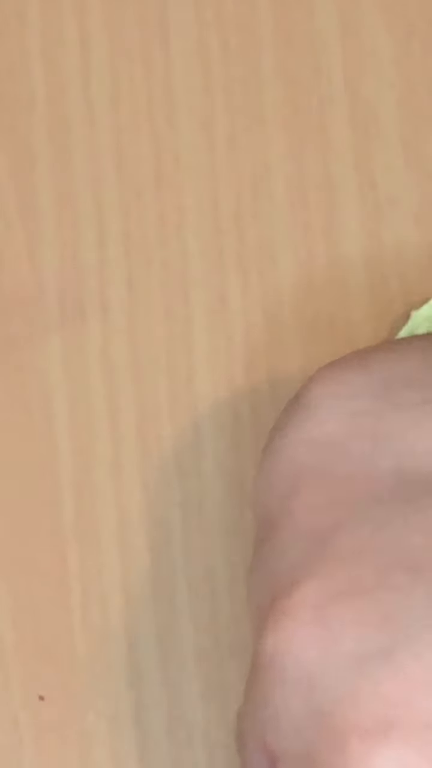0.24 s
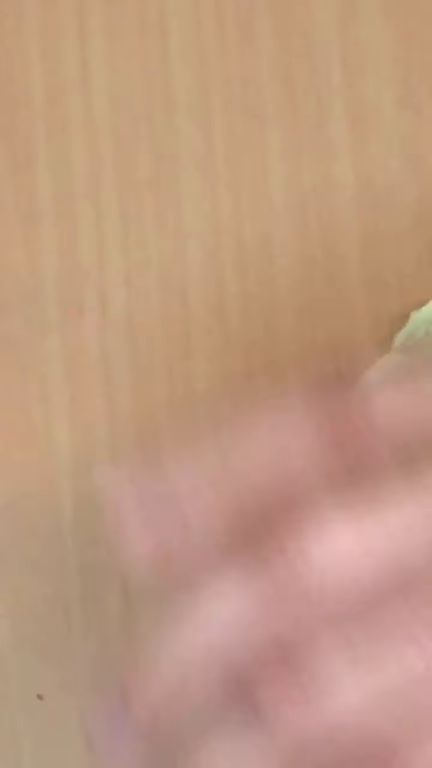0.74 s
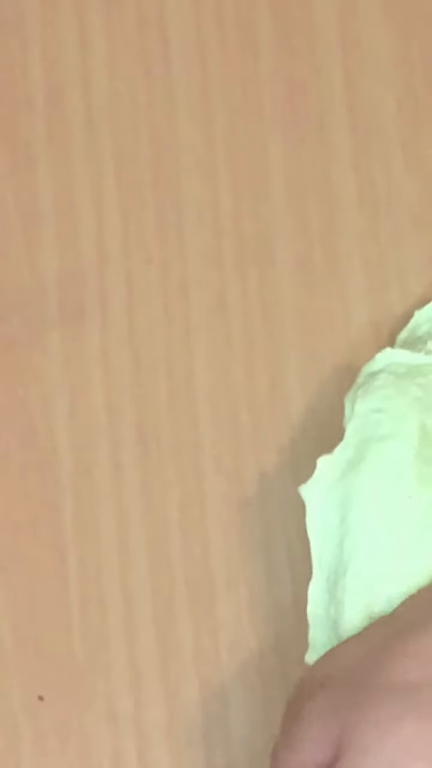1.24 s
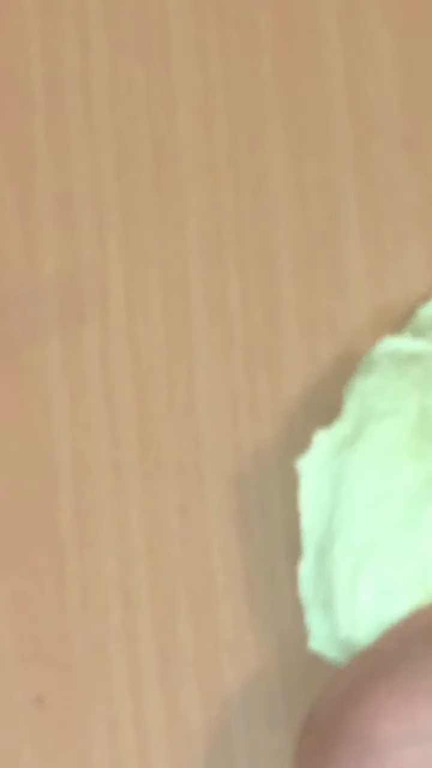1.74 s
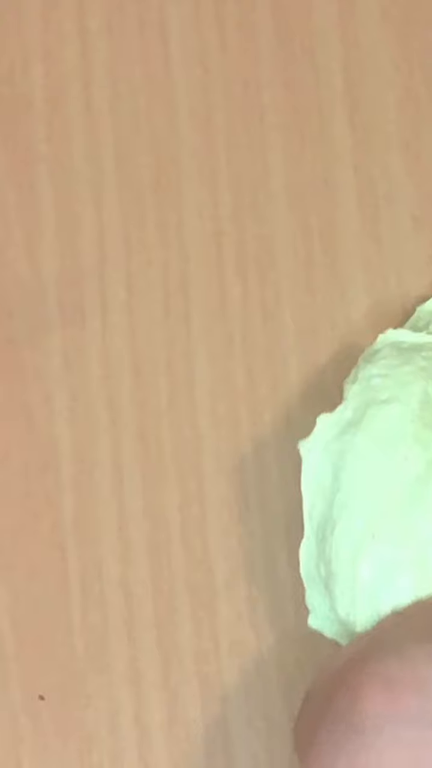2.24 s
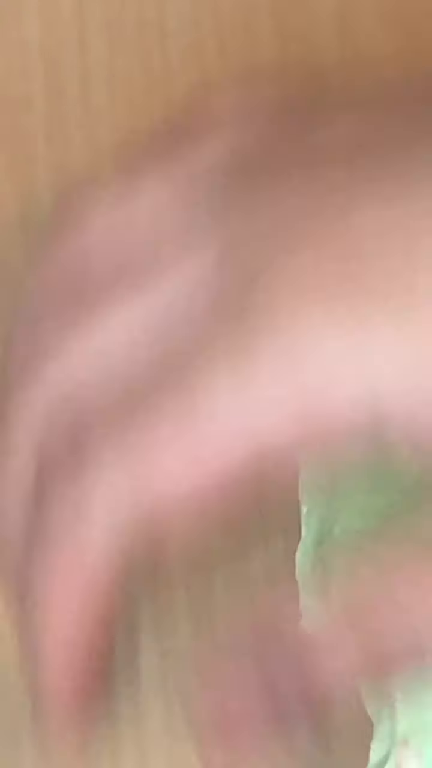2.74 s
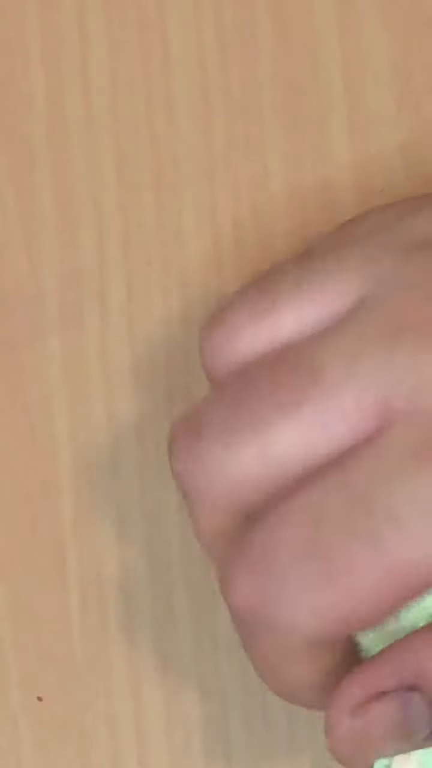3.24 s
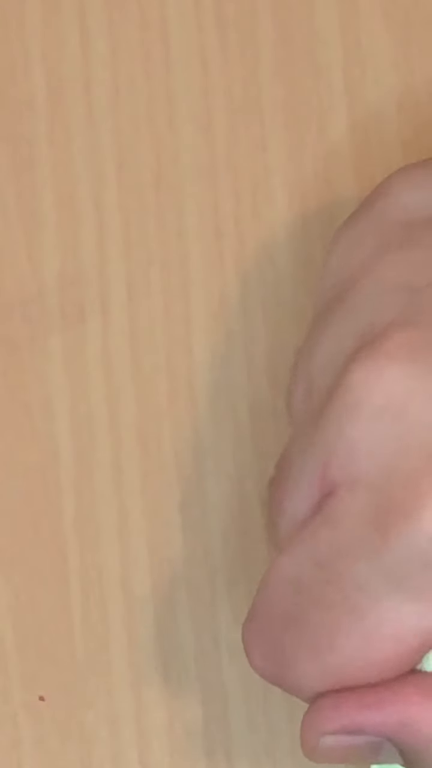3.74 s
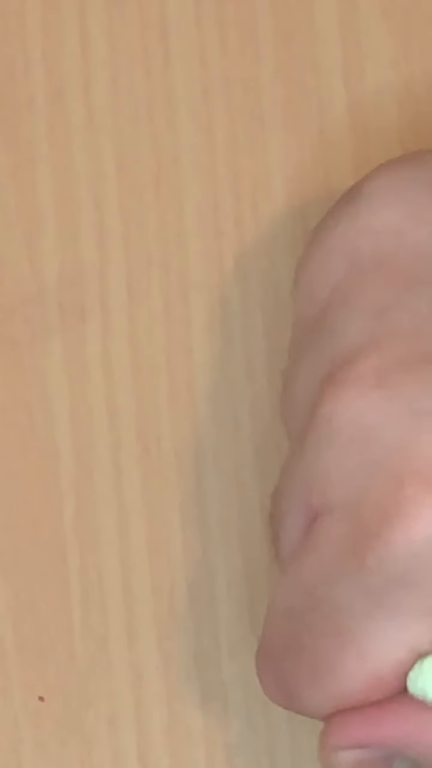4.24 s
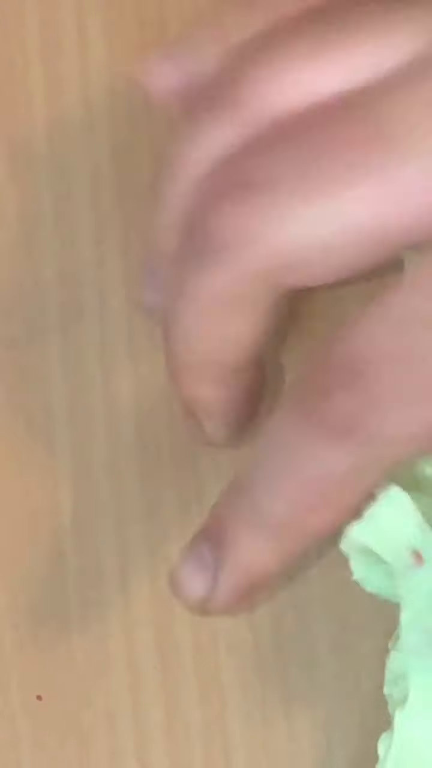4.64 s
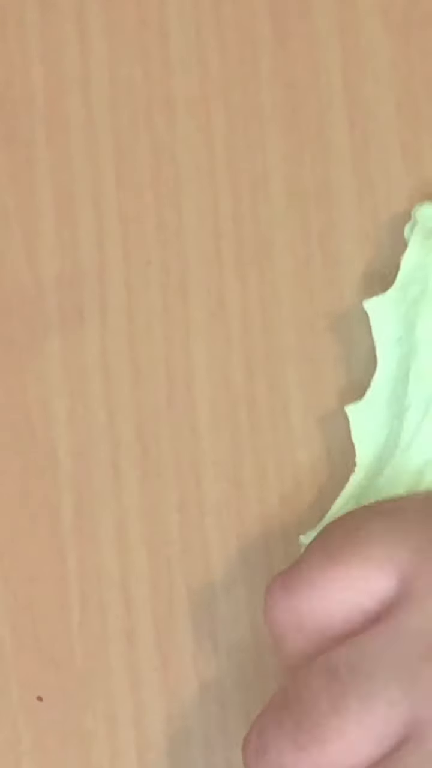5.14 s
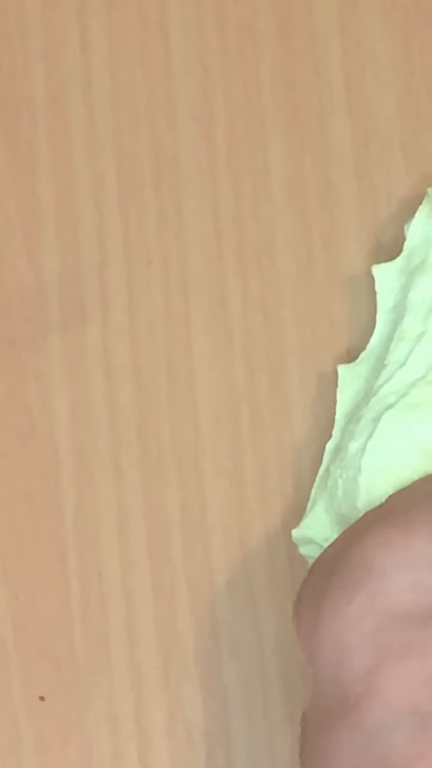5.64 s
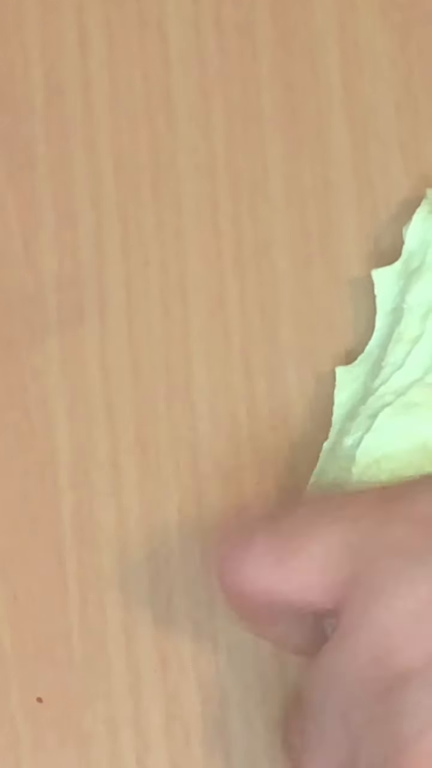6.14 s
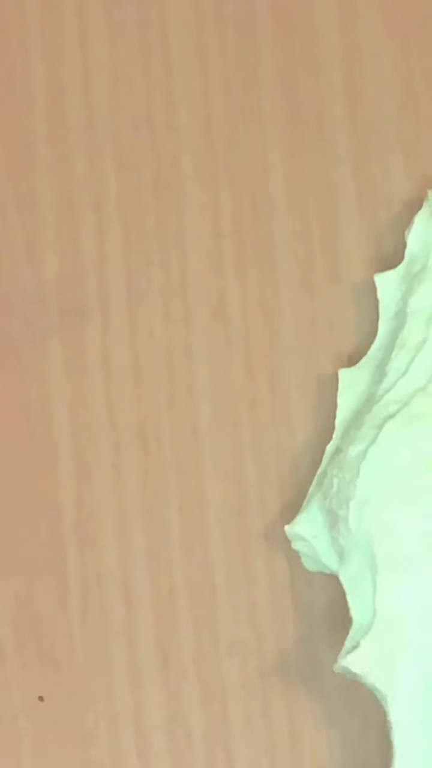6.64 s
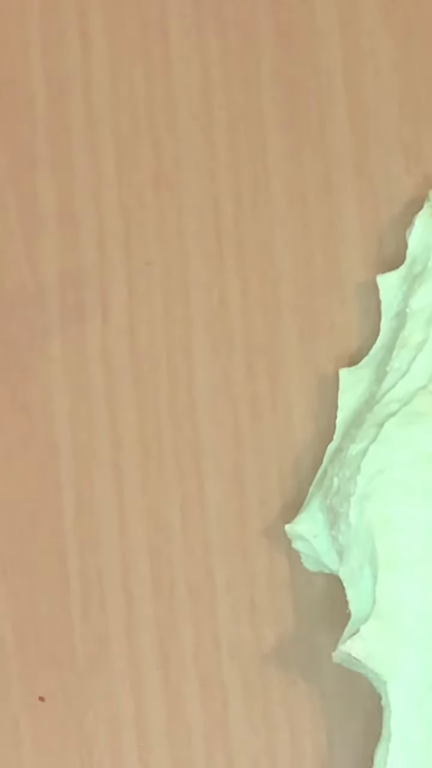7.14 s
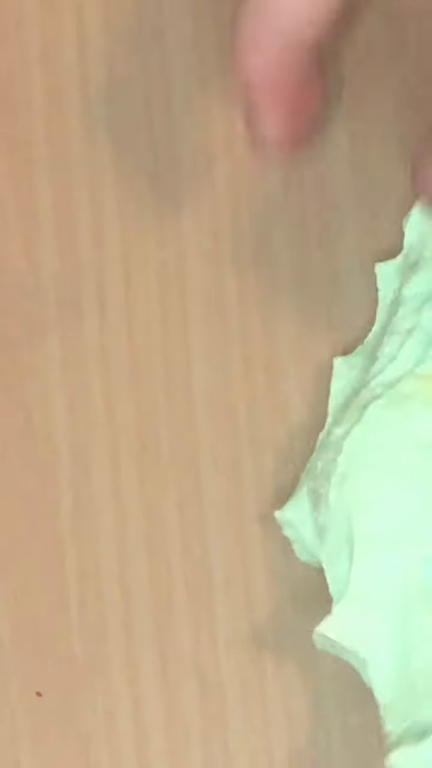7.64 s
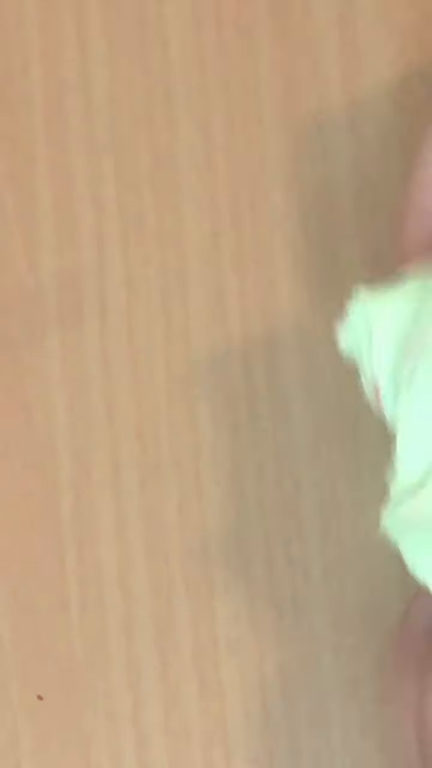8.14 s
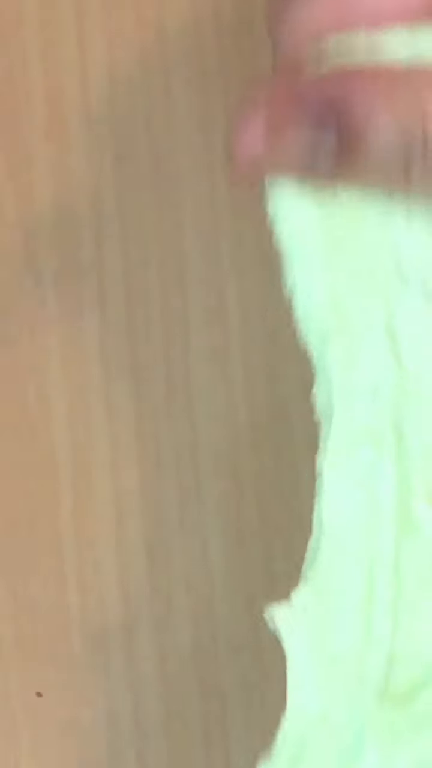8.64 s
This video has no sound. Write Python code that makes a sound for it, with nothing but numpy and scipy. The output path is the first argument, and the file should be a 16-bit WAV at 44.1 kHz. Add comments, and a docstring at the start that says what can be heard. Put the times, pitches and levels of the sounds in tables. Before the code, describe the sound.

Close-up kneading of soft slime: bursts of sharp air-pocket pops over fine crackle, sticky skin rubs and low wet plops in a small room.

```python
"""A small room, a wooden table, the microphone close to a hand kneading soft slime.
At once a squeeze bursts large air pockets: sharp pops over fine crackle; then skin rubs off and bumps the table.
Squeezes return from about 1, 3, 5 and 6.8 s, some with low wet plops; a tiny squeak slips out near 6.9 s.
Films snap and cavities ring, skin lets go in filtered noise slips, plops and bumps knock in decaying sines.
Table reflections, room echoes and a faint rumble and hiss lie under it all; the loudest pops overload."""
import sys
import numpy as np
from scipy import signal
from scipy.fft import rfft, irfft
from scipy.io import wavfile
from scipy.ndimage import uniform_filter1d

SR = 44100
rng = np.random.default_rng(int(sys.argv[2]) if len(sys.argv) > 2 else 0)


def wav_record(signal):
    """Record a signal, one row per channel, as 16-bit PCM in the file named by sys.argv[1]."""
    frames = np.transpose(np.atleast_2d(signal))
    bounded = np.clip(frames, -1, 1)
    # unit amplitude maps onto the largest positive 16-bit level
    quanta = np.round(bounded * 32767).astype(np.int16)
    wavfile.write(sys.argv[1], SR, quanta)


N = 392490
TOP_HZ = 15900  # upper limit of the microphone and of the random burst pitches


def undb(db):
    """Decibels to gain."""
    return 10 ** (np.asarray(db) / 20)


def unit(x):
    """Scale to an energy of one."""
    return x / np.sqrt(np.sum(x ** 2) + 1e-18)


def seconds(length):
    """A time axis in seconds."""
    return np.arange(int(length * SR)) / SR


def add(track, s, x):
    """Mix a short sound into a track at a time in seconds."""
    i = int(np.clip(s * SR, 0, N - 1))
    track[i:i + len(x)] += x[:N - i]


def lookup(points, hz):
    """Read (f/Hz, value) points on a log-frequency axis."""
    f, value = np.transpose(points)
    return np.interp(np.log(hz + 1), np.log(f), value)


def shape(x, points):
    """Filter a sound by (f/Hz, level/dB) points."""
    gain = undb(lookup(points, np.fft.rfftfreq(len(x), 1 / SR)))
    return irfft(rfft(x) * gain, len(x))


def colour(x, points):
    """Filter a sound by a spectrum and scale it to an rms of one."""
    y = shape(x, points)
    return y / np.std(y)


def ring(x, hz, q):
    """A two-pole resonance, with the same shape high in the treble as lower down."""
    f = np.fft.rfftfreq(len(x), 1 / SR) + 1e-3  # avoids dividing by zero
    return irfft(rfft(x) / (1 + 1j * q * (f / hz - hz / f)), len(x))


def wander(rate):
    """Smooth random drift with a spread of one, from `rate` random steps per second."""
    k = max(int(SR / rate), 1)
    steps = np.repeat(rng.standard_normal(N // k + 1), k)[:N]
    y = uniform_filter1d(steps, k)
    return y / np.std(y)


def pop(hz, q, snap_db, snap_hz=6500, snap_q=0.27, tear_s=.0001, edge=1.0,
        skin_hz=480, skin_s=.0016, sag_s=0.0016, sag_by=.6, skin_db=-22.0):
    """A film tears with a snap, its air pocket rings briefly, and the slime skin shakes, most for low pockets."""
    t, q = np.arange(512) / SR, max(q, .3)
    kick = signal.unit_impulse(len(t), 8)
    # a pocket takes time to open, so its ring has a steep upper edge
    edge_hz = min(hz * (1 + edge / q), .45 * SR)
    opening = signal.lfilter(*signal.butter(4, edge_hz, fs=SR), kick)
    cavity = unit(ring(ring(opening, hz, q), hz, q))
    tear = rng.standard_normal(len(t)) * np.exp(-t / tear_s)
    tear = np.roll(tear, shift=np.argmax(kick))
    snap = unit(ring(.5 * unit(tear) + kick, snap_hz, snap_q))
    # the slackening skin drops in pitch: a wet plop
    sag = skin_hz * 2 ** (0.23 * rng.standard_normal()) * (1 + sag_by * np.exp(-t / sag_s))
    plop = np.sin(2 * np.pi * np.cumsum(sag) / SR) * np.exp(-t / skin_s)
    skin = unit(plop * np.sin(np.pi * t / t[-1])) * (2500 / hz) ** .45
    return unit(cavity + undb(snap_db) * snap + undb(skin_db) * skin)


# the large air pockets, each heard as its own pop:
# (t/s, energy level/dB, cavity f/Hz, cavity Q [at least 0.3 is used], film snap level/dB re cavity)
POCKETS = [(0.0022, 11.5, 2080, 2.1, 2.5), (0.0271, 14, 1960, 1.2, 7.5), (0.08, 9, 12000, 0.79, -3.5),
           (0.091, 3.5, 14500, .65, -9.5), (0.104, 11.5, 6800, 0.84, 7.5), (0.1954, 10, 9600, 0.89, 0.5),
           (0.2126, 8.5, 9840, 1.1, 3.5), (0.2317, 3, 12000, 2.7, 4), (0.258, 4, 11300, 1.9, 11),
           (1.1088, -22.5, 4830, 3.7, 0), (1.117, -28, 10100, 1, -1), (1.1459, -14, 900, 0.37, -15),
           (1.213, -3.5, 1720, 0.46, -23.5), (1.2546, 5.5, 2130, 0.37, -21), (1.2758, -7.5, 3280, .3, -30),
           (1.3224, -4.5, 1430, 0.69, -1), (1.3392, -14.5, 1530, 3.7, -16), (1.3837, -12, 3140, .7, -4.5),
           (1.4177, 5.5, 2920, 0.58, -7.5), (1.4217, -3.5, 7120, 2.5, 4.5), (1.433, 0.5, 10500, 2.2, -10),
           (1.4393, 2, 2800, .5, -14), (1.4626, -1, 1250, 0.35, 9), (1.5293, 4.5, 11300, 1.5, -3.5),
           (1.5671, 4.5, 7700, 0.52, -5.5), (1.6008, 8.5, 3540, 0.59, -25.5),
           (1.6417, -4.5, 14500, .45, -6.5), (1.656, -9.5, 14500, .65, -16), (1.6999, 14, 2200, 0.37, -5.5),
           (1.7812, 13.5, 7300, 0.95, -16), (1.9737, -9, 14500, 1.7, 0), (1.9814, -12, 3400, 0.72, -20),
           (2.0555, 7, 2790, 1.55, 0), (3.2467, -26, 2880, 0.41, -22), (3.3647, -7, 4800, 0.47, 4),
           (3.5045, -13, 4530, 0.49, 18), (3.598, -16.5, 3350, 0.62, -27.5), (3.663, -13, 4250, 0.59, -19),
           (3.6698, -7.5, 6200, 4.9, 4), (3.7052, 8, 4280, 0.71, -29.5), (3.723, -9.5, 1430, 1.4, 3.5),
           (3.753, 1.5, 4260, 0.94, -22), (3.7991, -7, 3980, 0.9, -24), (3.8083, -7, 11400, 1.9, 7),
           (3.84, -9.5, 12800, 2, -11), (3.873, -5.5, 12600, 3.5, 2), (3.9794, -22, 3980, 1.6, -4),
           (4.0778, -10, 1300, 0.34, -2.5), (4.1358, -5, 3600, 2.6, -16), (4.259, -16.5, 4530, .45, -20),
           (5.055, -8.5, 2350, 0.73, -18), (5.1843, 0, 2160, 1.24, -11), (5.204, 6, 4200, 0.5, 4),
           (5.274, 1.5, 3360, 0.62, -7), (5.321, 6, 9000, 0.93, -20), (5.359, -14, 1770, 4, -28),
           (5.3959, -4.5, 13000, 1.6, 8), (5.43, -12, 2530, 0.92, 2), (5.474, -10, 2000, 1.1, -2),
           (5.5106, -4, 2380, 1.2, -4), (5.5443, -11, 9840, 0.95, 0), (5.5645, -3.5, 13590, 1.8, 5),
           (5.6355, 3.5, 11800, 0.99, -3), (5.674, -4.5, 11300, 2.4, 6.5), (5.679, 3.5, 12800, 2, -13.5),
           (5.7821, -3, 10400, 3, -1), (5.8013, -1, 10500, 4.7, -3), (5.817, -5, 9840, 2.3, 22),
           (6.8064, -11, 2390, 2.2, -1.5), (6.8315, -5.5, 8650, 0.48, 14), (6.8509, -6.5, 5640, 0.55, -14),
           (6.9382, -6, 4600, 2.4, 4), (7.0176, -6.5, 2970, 1.1, -6), (7.0375, -16, 12000, 1.1, -2),
           (7.0493, -12, 14700, 1.3, -2), (7.1005, 7.5, 5600, 0.65, -12.5), (7.6533, -21, 9180, 0.68, 2),
           (8.0307, -12, 7200, 0.37, 4), (8.1115, -13, 2260, .4, -27), (8.3901, -21, 2370, 0.31, -15),
           (8.4815, -18.5, 2660, 0.23, -23), (8.581, 4.5, 8550, 0.91, -16.5), (8.7677, -9, 11700, 3.8, 11),
           (8.8626, -4.5, 11940, 2.9, 19)]


def pops(count=3, weaker_db=-24.5, lag_s=.0025, lag_spread_s=.0022, spread_db=4.5, spread_octaves=0.55):
    """Large pockets burst one by one, each taking a few weak neighbours with it, mostly just after."""
    out = np.zeros(N)
    chance = rng.standard_normal((len(POCKETS), count, 3))
    for (s, db, hz, q, snap_db), neighbours in zip(POCKETS, chance):
        # the kick inside a pop comes about 0.2 ms after its start
        add(out, s - .0002, undb(db) * pop(hz, q, snap_db))
        for lag, size, pitch in neighbours:
            burst = pop(min(hz * 2 ** (spread_octaves * pitch), TOP_HZ), q, snap_db)
            level = undb(db + weaker_db + spread_db * size)
            add(out, s + lag_s + lag_spread_s * lag, level * burst)
    return out


# squeezes that burst the smaller bubbles:
# (start t/s, end t/s, bubble energy level/dB before the crackle trim, middle f/Hz)
SQUEEZES = [(0, 0.292, -13.5, 8400), (0.989, 1.201, -46.5, 5000), (1.191, 1.94, -27, 5440),
            (3.091, 3.478, -43, 4970), (3.475, 3.904, -24, 6500), (3.948, 4.3, -37, 5950),
            (5.082, 5.922, -26.5, 5840), (6.758, 7.08, -24, 7450), (7.397, 7.734, -36, 6500),
            (7.9, 8.302, -36.5, 5900), (8.386, 8.619, -24, 7100), (8.614, 8.9, -30.5, 7800)]


def crackle(rate=180, spread_db=5.5, spread_octaves=.9, q=1.4, snap_db=-10, trim_db=-4,
            grip_s=0.068, ease_s=0.04, slack_db=-6):
    """Small bubbles burst at random under pressure, weaker as the grip tightens and as it eases."""
    out = np.zeros(N)
    chance = rng.standard_normal((int(rate * N / SR), 3))
    for k, (slip, size, pitch) in enumerate(chance):
        s = (k + slip) / rate
        for start, end, db, hz in SQUEEZES:
            if start < s < end:
                grip = min(1, (s - start) / grip_s, (end - s) / ease_s)
                energy_db = trim_db + db + slack_db * (1 - grip) + spread_db * min(size, 2)
                burst = pop(min(hz * 2 ** (spread_octaves * pitch), TOP_HZ), q, snap_db)
                add(out, s, undb(energy_db) * burst)
    return out


def squeak(start=6.9045, from_hz=3100, to_hz=3800, db=-23, air_db=1):
    """Air forced through a pinhole flutters its rim; the pitch rises as the pocket empties."""
    out, t = np.zeros(N), seconds(.0135)
    u = t / t[-1]
    flutter_hz = 900 * rng.standard_normal(len(t))
    phase = 2 * np.pi * np.cumsum(from_hz + (to_hz - from_hz) * u + flutter_hz) / SR
    tone = sum(undb(-4 * k) * np.sin((k + 1) * phase) for k in range(4))
    air = ring(rng.standard_normal(len(t)), 8300, 1.7)
    hiss = undb(air_db) * 2 * (1 - u) * air / np.std(air)
    swell = np.sin(np.pi * np.sqrt(u))
    add(out, start, undb(db) * swell * (tone + hiss))
    return out


def slide(length, attack_s=0.038, sag_db_per_s=39, release_s=0.033):
    """Pressure of one slide: it swells, weakens as the skin peels away, then lets go."""
    t = seconds(length + release_s)
    contact = np.minimum(np.minimum(t / attack_s, (t[-1] - t) / release_s), 1)
    return np.sin(np.pi / 2 * contact) ** 2 * undb(-sag_db_per_s * t)


# skin sliding off the slime: (start t/s, length t/s before the release, level/dB before sag and trim)
RUBS = [(0.333, 0.12, -52.5), (0.418, 0.19, -40), (2.2, 0.12, -58), (2.298, 0.11, -48), (2.415, 0.078, -39),
        (2.491, 0.13, -45.5), (4.312, 0.073, -45.5), (4.397, .2, -43), (6.01, 0.074, -54),
        (6.068, 0.099, -47), (6.147, 0.16, -43), (6.628, 0.14, -50.5), (7.218, 0.15, -52.5),
        (7.289, 0.11, -44.5), (7.391, 0.18, -56), (7.543, 0.15, -53.5), (7.697, 0.12, -62),
        (7.854, 0.19, -50.5), (8.038, 0.08, -43), (8.125, 0.13, -56), (8.268, 0.14, -58.5)]
# spectrum of the sticky skin contact: (f/Hz, level/dB)
RUB_COLOUR = [(59, -45), (100, -12), (202, -1), (271, -12.5), (358, -3.5), (662, -11), (1760, -4.5),
              (2130, -13.5), (2690, -7.5), (3540, -11.5), (4290, -11.5), (16000, -16.5)]


def rubbing(trim_db=-2, grain_db=5, flutter_db=2.5, patchy_db=4.5):
    """Skin lets go of the sticky surface in countless tiny slips; their colour shifts as the contact moves."""
    pressure = np.zeros(N)
    for s, length, level_db in RUBS:
        add(pressure, s, undb(level_db) * slide(length))
    grain = undb(grain_db * np.minimum(rng.exponential(size=N), 5))
    slips = rng.standard_normal(N) * grain
    # peel off one band after another, each with its own drifting level
    lumpy = 0
    for hz in 250 * 2 ** np.arange(0, 5, .7):
        low = signal.sosfiltfilt(signal.butter(2, hz, fs=SR, output="sos"), slips)
        lumpy, slips = lumpy + low * undb(patchy_db * wander(45)), slips - low
    flutter = undb(trim_db + flutter_db * wander(130))
    return colour(lumpy + slips, RUB_COLOUR) * pressure * flutter


# low plops of wet slime bubbles, and soft bumps of hand and slime on the table:
# (t/s, level/dB, knock f/Hz)
PLOPS_AND_BUMPS = [(0.444, -40, 320), (1.214, -33.5, 421), (1.257, -34.5, 362), (1.323, -38.5, 327),
                   (2.445, -40.5, 357), (3.246, -46.5, 543), (3.505, -48, 434), (3.724, -43, 375.5),
                   (5.187, -40.5, 329), (5.31, -34, 458), (5.398, -36, 616), (6.502, -28.5, 393),
                   (7.446, -43, 299), (7.876, -38.5, 404), (8.088, -34, 517), (8.236, -45, 261)]
# modes of the short hollow knock: (multiple of the knock f, level/dB, t60/s)
KNOCK_MODES = [(1 / 3, -17, .1), (1 / 2, -14, .09), (3 / 4, -6, .07), (7 / 8, 0, .09), (1, -1, .08),
               (2, -24, .06)]


def plops_and_bumps(pat_db=-14, pat_s=0.026, pat_hz=1700, pat_q=0.75, push_s=0.00086, thud_db=-14):
    """A low plop or a soft bump: a short hollow knock, a dull thud and a brief pat of noise."""
    out, t = np.zeros(N), seconds(.25)
    for s, db, hz in PLOPS_AND_BUMPS:
        pitches = hz * (1 + .015 * rng.standard_normal(len(KNOCK_MODES)))
        knock = 0
        for (ratio, gain, t60), f in zip(KNOCK_MODES, pitches):
            knock = knock + undb(gain - 60 * t / t60) * np.sin(2 * np.pi * ratio * f * t)
        noise = rng.standard_normal(len(t)) * np.exp(-t / pat_s)
        pat = 2 * undb(pat_db) * ring(noise, pat_hz, pat_q)
        thud = 10 * undb(thud_db) * ring(ring(noise, hz / 2, 0.45), hz / 2, 0.45)
        push = 1 - np.exp(-t / push_s)
        add(out, s, undb(db) * ((.5 * knock + thud) * push + pat))
    return out


def mirrored(x, bounce=1.0, bounce_s=.00072, scatter_db=-10, scatter_s=0.0035):
    """The table top mirrors each burst after a drifting delay; fingers and nearby things scatter it."""
    i, t = np.arange(N), seconds(0.01)
    lag = (SR * bounce_s * (1 + 0.11 * wander(8.3))).astype(int)
    paths = unit(rng.standard_normal(len(t)) * np.exp(-t / scatter_s) * (t > .0008))
    reflected = bounce * x[np.clip(i - lag, 0, N - 1)]
    scattered = undb(scatter_db) * signal.fftconvolve(x, paths)[:N]
    return (x + reflected) / np.hypot(1, bounce) + scattered


# spectrum of the echoes: (f/Hz, level/dB)
ROOM_COLOUR = [(100, 1), (300, 0), (460, 4), (650, 6.5), (950, -0.5), (1500, -1), (3000, -1.5),
               (6000, -2.5), (10000, -1.5), (16000, -6.5)]
# how long the echoes last: (f/Hz, t60/s)
ROOM_DECAY = [(200, 0.32), (550, 0.39), (1400, .37), (3700, 0.39), (9000, 0.26), (15000, 0.26)]


def room(x, db=-7.5, first_s=.0115, early_db=3, early_s=0.023):
    """Bare walls answer after a short gap with a dense cluster of echoes, then a smooth tail."""
    t = seconds(.6)
    uneven = undb(3.3 * rng.standard_normal(len(t)) * np.exp(-t / .03))
    echoes = rng.standard_normal(len(t)) * uneven
    # each frequency band fades at its own rate
    f, s, bands = signal.stft(echoes, SR, nperseg=256)
    fade = undb(-60 * s / lookup(ROOM_DECAY, f)[:, None])
    tail = signal.istft(bands * fade, SR)[1][:len(t)]
    cluster = undb(early_db * np.exp(-((t - early_s) / early_s) ** 2))
    tail = shape(unit(tail * cluster), ROOM_COLOUR)
    response = np.r_[np.zeros(int(first_s * SR)), tail[:len(t) * 3 // 4]]
    return undb(db) * signal.fftconvolve(x, response)[:N]


# spectrum of the indoor background: (f/Hz, level/dB)
FLOOR = [(15, -45.5), (28, -22), (45, -12.5), (64, -6), (100, -10.5), (130, -9), (240, -14.5), (400, -20.5),
         (840, -24.5), (2500, -36.5), (8800, -41.5), (16000, -42.5)]


def background(db=-64):
    """A faint indoor rumble and hiss: steady noise weighted to the bass, at an rms level in dB."""
    return undb(db) * colour(rng.standard_normal(N), FLOOR)


def scene(rub_room_db=-1, low_room_db=-5):
    """Slime, hand and table close by, their echoes in the room, and the background."""
    bubbles, skin, lows, pinhole = pops() + crackle(), rubbing(), plops_and_bumps(), squeak()
    floor = background()
    # the pinhole points at the microphone, so the walls get less of it
    echo = room(bubbles + undb(rub_room_db) * skin + undb(low_room_db) * lows + .5 * pinhole)
    return (mirrored(bubbles) + skin + lows + pinhole + echo + floor)[None]


def record(dry, ceiling=0.84):
    """The microphone flattens the loudest peaks, leaving the bass clean; the top is cut."""
    excess = dry - dry / (1 + (dry / ceiling) ** 4) ** (1 / 4)
    # only the part of the flattening above 700 Hz is applied
    above_bass = signal.butter(2, 700, "high", fs=SR, output="sos")
    limited = dry - signal.sosfiltfilt(above_bass, excess)
    return signal.sosfilt(signal.ellip(8, .2, 70, TOP_HZ, fs=SR, output="sos"), limited)


dry = scene()
out = record(dry)
wav_record(out)
```